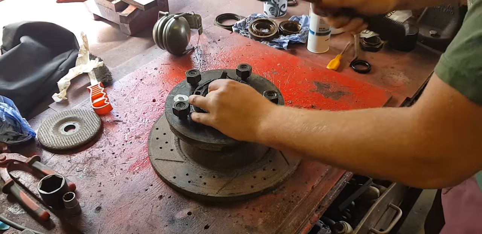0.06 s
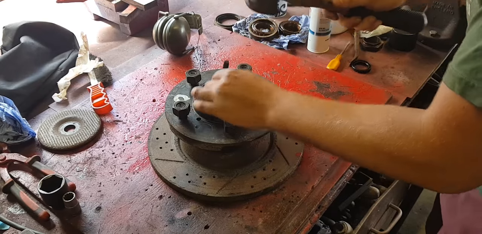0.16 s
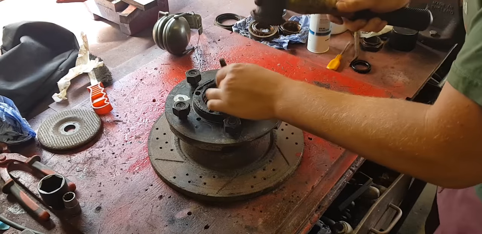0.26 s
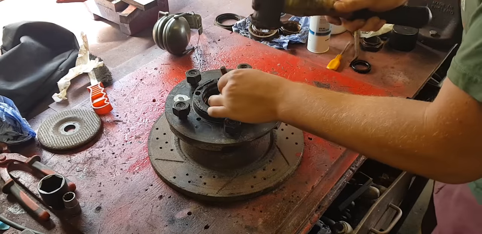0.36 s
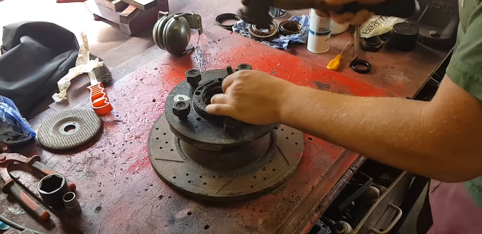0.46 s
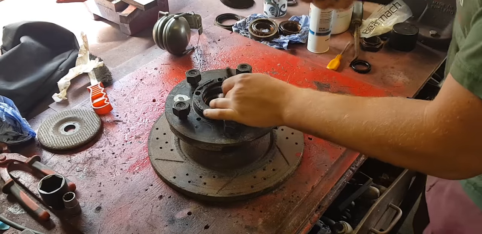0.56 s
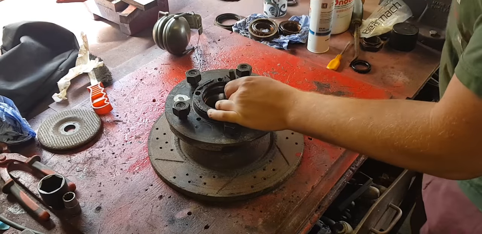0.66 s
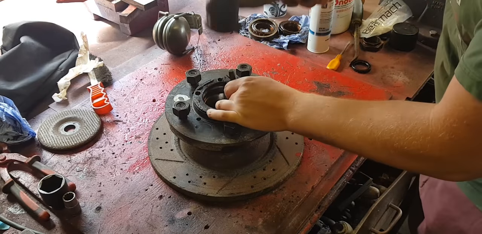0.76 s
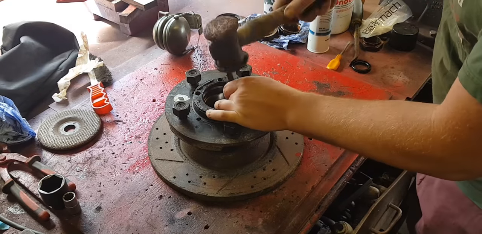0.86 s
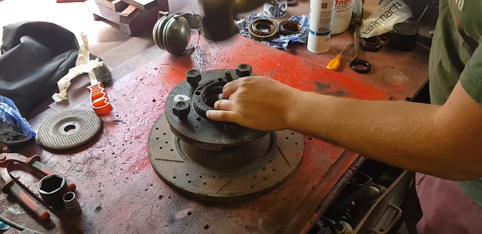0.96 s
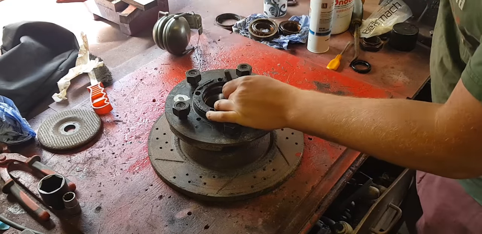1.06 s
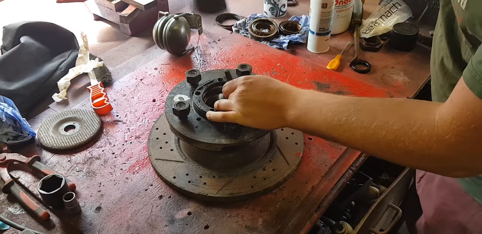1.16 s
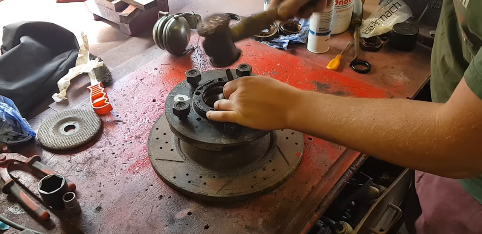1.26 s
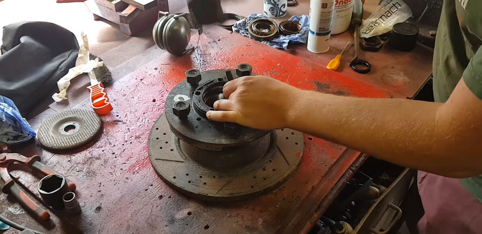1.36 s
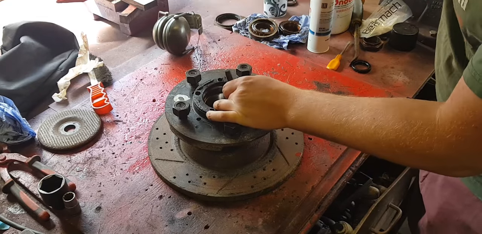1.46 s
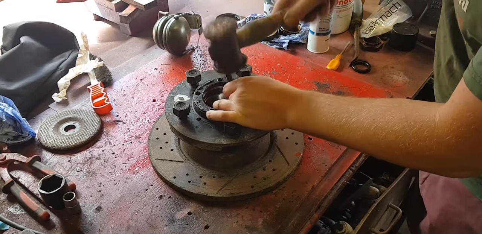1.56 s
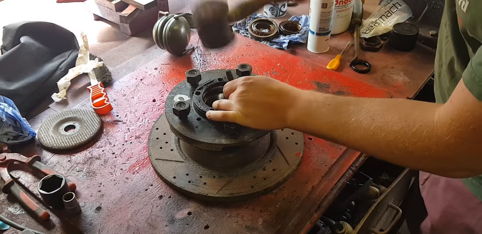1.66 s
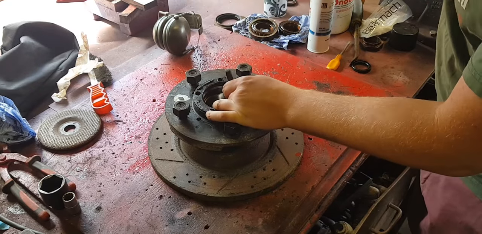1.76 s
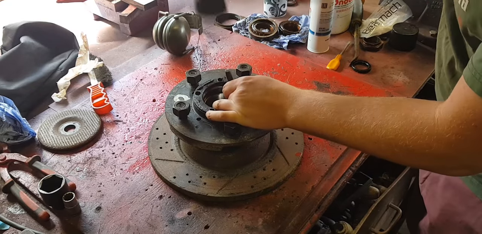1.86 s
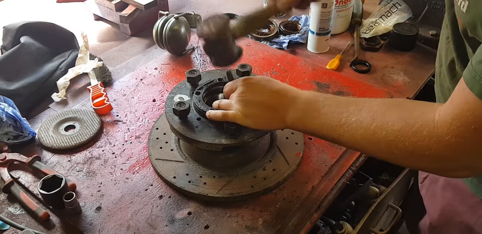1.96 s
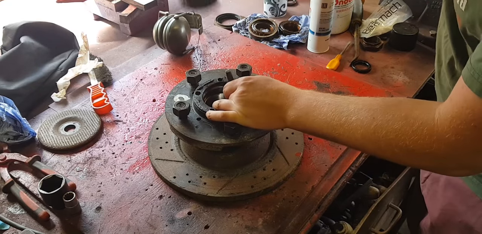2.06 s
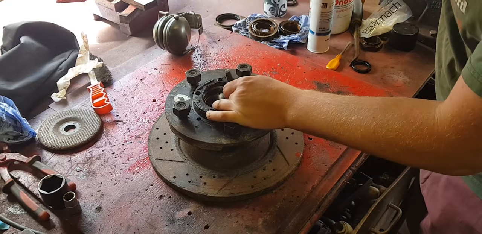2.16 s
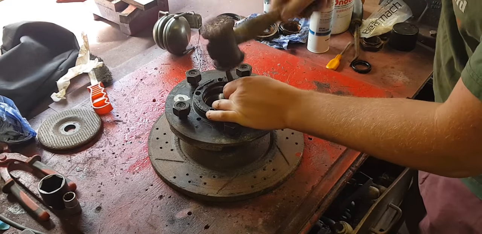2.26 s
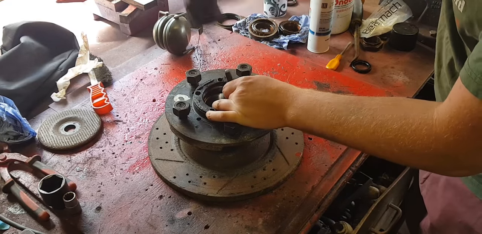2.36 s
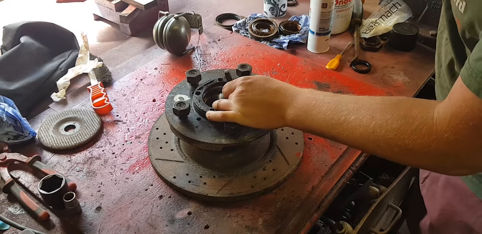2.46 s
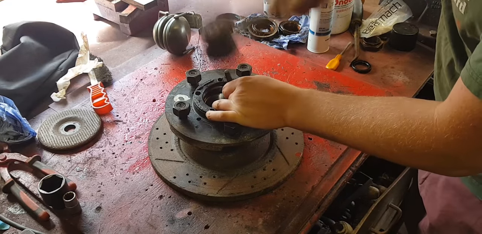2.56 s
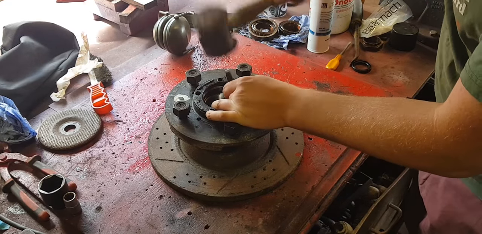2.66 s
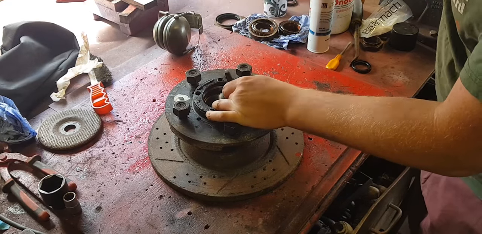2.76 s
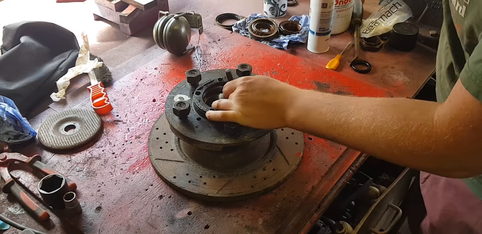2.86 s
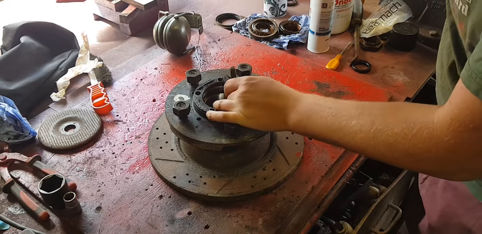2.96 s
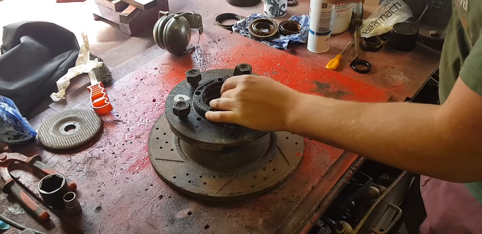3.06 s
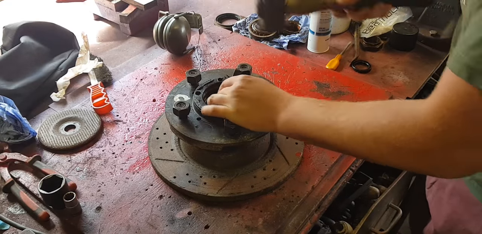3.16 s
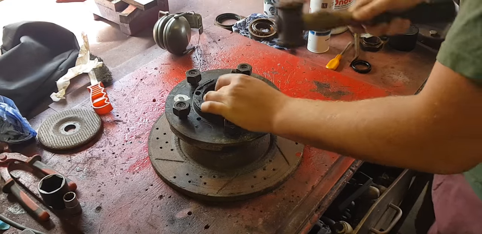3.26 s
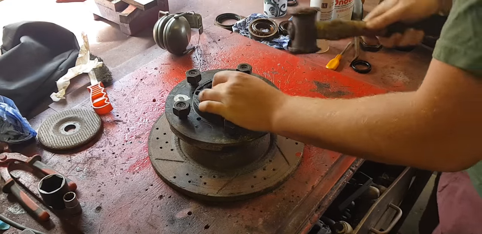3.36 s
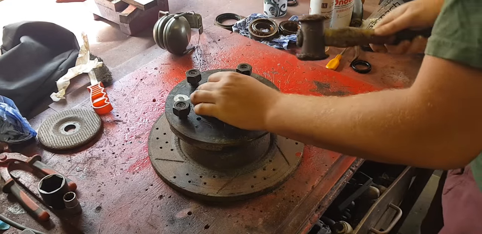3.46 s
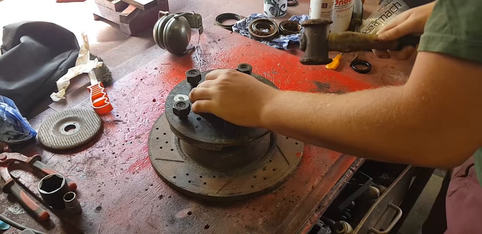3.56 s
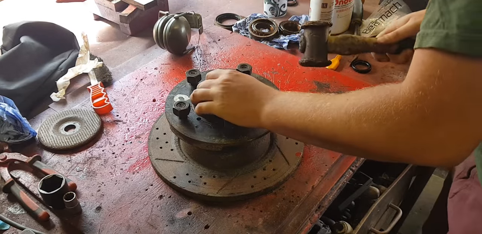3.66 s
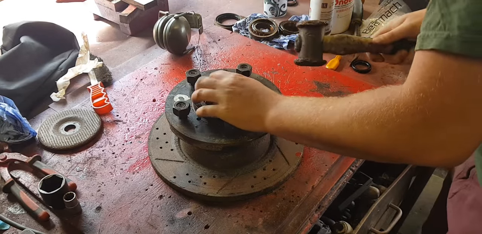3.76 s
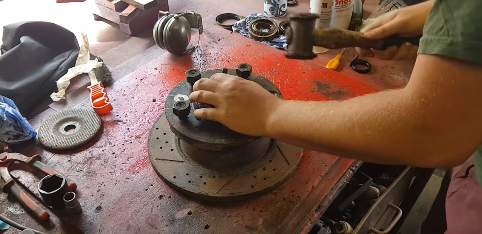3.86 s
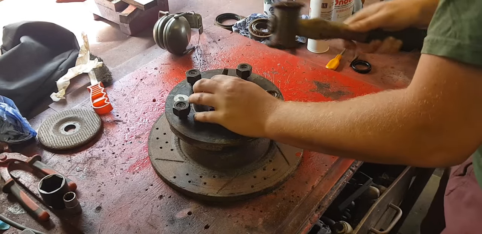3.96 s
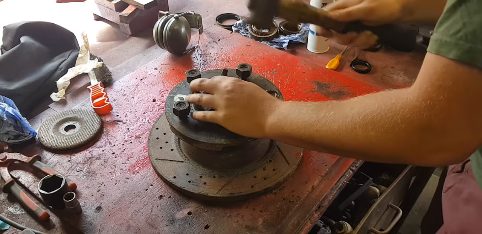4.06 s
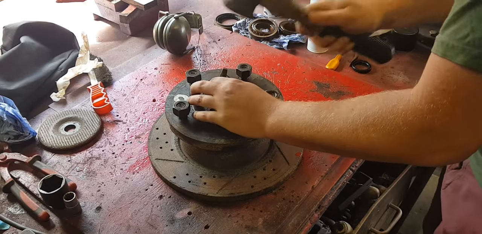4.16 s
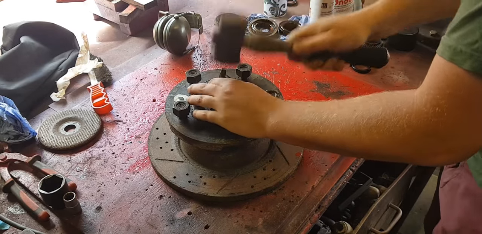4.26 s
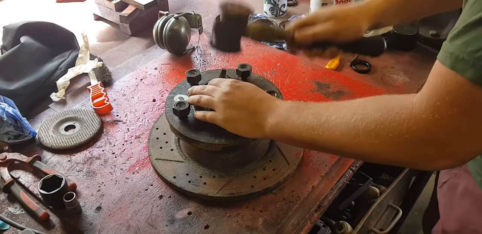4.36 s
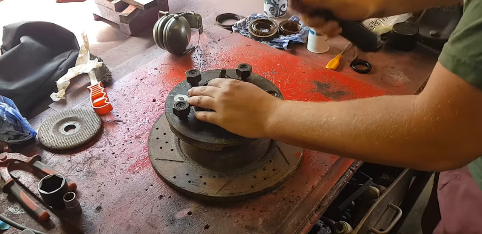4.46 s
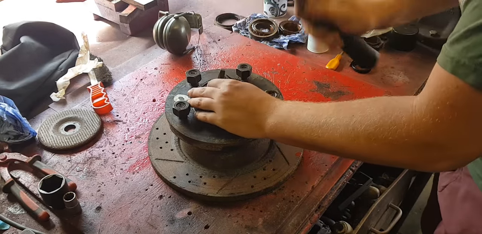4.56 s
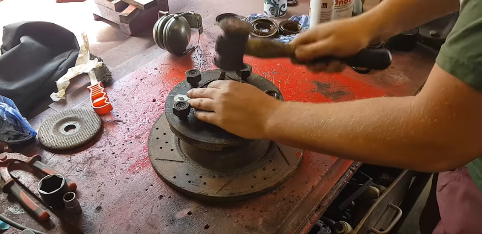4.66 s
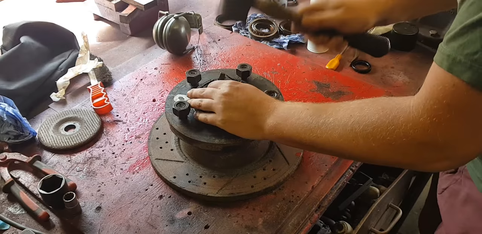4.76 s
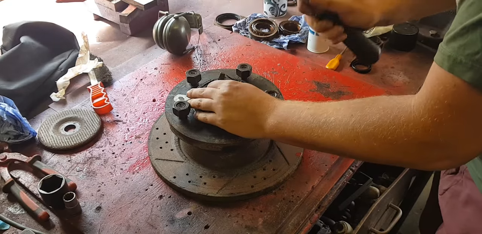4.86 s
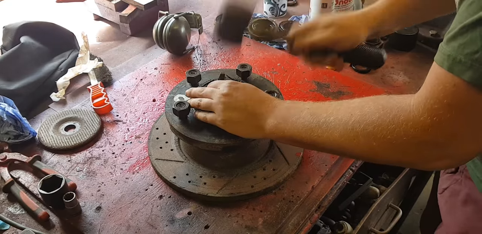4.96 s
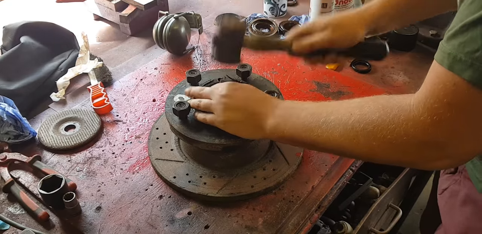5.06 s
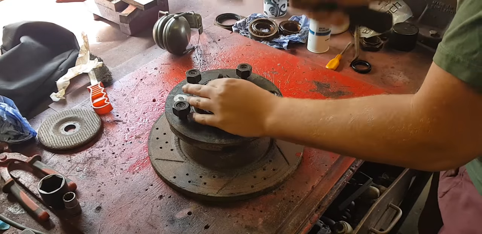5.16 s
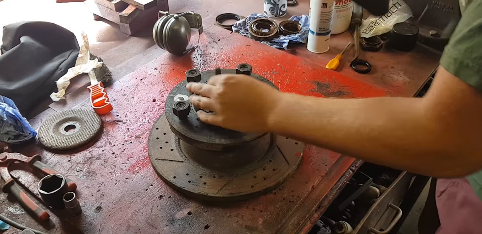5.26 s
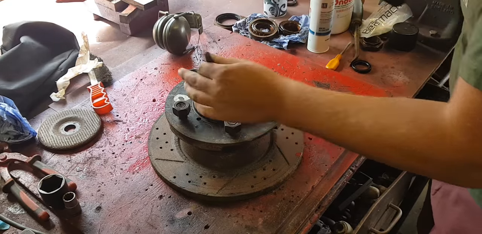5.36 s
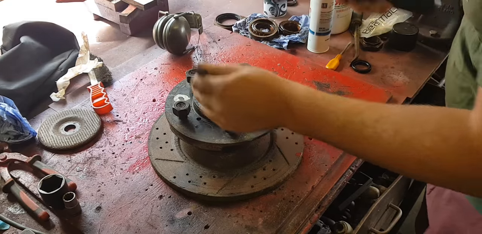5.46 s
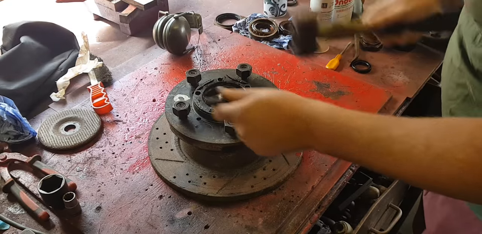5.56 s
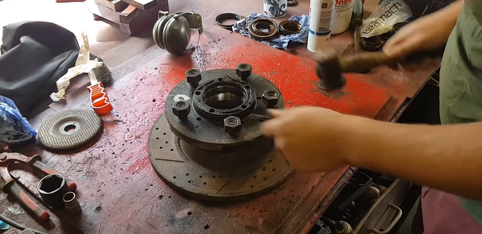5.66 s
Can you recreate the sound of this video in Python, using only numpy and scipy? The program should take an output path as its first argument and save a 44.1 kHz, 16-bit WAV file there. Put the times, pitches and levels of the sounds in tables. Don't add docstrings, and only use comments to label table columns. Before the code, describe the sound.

Close stereo capture at a garage workbench: the tail of an earlier blow, delicate clinks as a punch is placed, then a run of five thudding, cracking metal blows about a third of a second apart. After a quiet gap with tiny clinks, three spaced blows follow, the last with a rapid hollow clatter. Loud peaks are squashed; distant motor and insects stay very faint.

```python
import sys
import numpy as np
from scipy import signal
from scipy.fft import rfft, irfft
from scipy.io import wavfile
from scipy.ndimage import uniform_filter1d

SR = 44100
rng = np.random.default_rng(int(sys.argv[2]) if len(sys.argv) > 2 else 0)


def persist_wave(psi):
    counts = np.round(np.clip(psi, -1, 1) * 32767).astype(np.int16)
    wavfile.write(sys.argv[1], SR, np.atleast_2d(counts).T)


def makeup_ratio(level_db):
    decades = np.asarray(level_db, float) / 20
    return 10 ** decades


N = 251362
LEAD = 11025
SOUND_LAG_S = 0.002

# time_s, push_into_hub_db, steel_snap_db, squareness_db (as crack gained)
BLOWS = [(-0.16, -4.5, -18, 3), (0.8992, -24.5, -30.5, 1.3), (0.9866, -54, -39, 6.8), (1.283, -14, -23, -7),
         (1.6158, -7, -18, -1.7), (1.9552, -5, -18.5, 1.8), (2.2873, -7, -17.5, 3.5),
         (2.628, -5.5, -15.5, 2), (4.3327, -21, -33.5, -4), (4.6852, -13.5, -18, -0.3),
         (5.0368, -23.5, -18, 4.5), (5.0436, -50, -31, -7)]
THUMP_UNDER_PUSH_DB, RING_UNDER_SNAP_DB = -8, -1.5
CRACK_PUSH_SHARE = 0.51
# freq_hz, level_db, t60_s
BENCH_MODES = [(62, -6.5, 0.1), (80, -5.5, 0.16), (118.2, -5.5, 0.11), (159, 1.5, .05), (233, 0.5, 0.065),
               (265, 2.5, 0.033), (323, 0.5, 0.03)]
# freq_hz, level_db, t60_s
SWAY_MODES = [(28.7, -6.5, 0.071)]
# freq_hz, level_db, t60_s
HUB_MODES = [(371.7, 6, 0.065), (442.6, -2, 0.11), (437, -7, 0.078), (639, -8, 0.11), (694, -12.5, 0.012),
             (932, -14, 0.086), (1066.3, -4, 0.04), (1318, -11, 0.034), (1410, -21.5, 0.023),
             (1556, -21, 0.021)]
# freq_hz, level_db, t60_s
STEEL_MODES = [(2740, -15.5, .03), (3140, -11, .03), (4100, -9, 0.006), (5900, -12, 0.025),
               (6250, -13, 0.02), (10900, -7, .02), (11250, -6, 0.025), (12100, -8.5, 0.02),
               (14300, -11, .03), (8600, -12, .11), (11480, -5, .11), (13590, -7, .1)]
# freq_hz, density_db_per_hz
THUD_SPECTRUM = [(120, -23), (250, 0.5), (400, 3), (700, -5), (1200, -14), (1800, -16), (2600, -26),
                 (5000, -50.5)]
# freq_hz, density_db_per_hz
CRACK_SPECTRUM = [(300, 4.5), (1200, 4.5), (2000, -4), (3000, -1.5), (4200, -4), (5400, -11.5),
                  (7000, -7.5), (15000, -40)]
# freq_hz, density_db_per_hz
SIZZLE_SPECTRUM = [(3000, -24.5), (5400, -4), (7300, -8), (8800, -2.5), (10000, -0.5), (11500, 2.5),
                   (13600, 0.5), (15500, -5.5)]

# time_s, impact_db, hollow_knock_db
DROPS = [
    (5.0455, -23, -38),
    (5.0553, -9, -12),
    (5.0575, -7, -17.5),
    (5.0655, -15.5, -20),
    (5.0975, -11, -27),
]
# freq_hz, level_db, t60_s
RACE_MODES = [(994, -12, 0.025), (1170, -5.5, 0.019), (1925, -11.5, .02), (2285, -14.5, 0.082),
              (2650, -0.45, 0.0038), (3560, -7.5, .006), (4053, -5.5, 0.036), (4373, -4.5, 0.019),
              (6260, -16, 0.0425)]
# freq_hz, level_db, t60_s
BORE_MODES = [(389, 3.5, 0.072), (683, -10.5, 0.05)]

# time_s, tick_db, knock_db, seat_over_disc_db
TOUCHES = [(0.110, -76, -60, 11), (0.3245, -42.5, -64, 8), (0.338, -42.5, -70, 2), (0.389, -47.5, -77, -8),
           (0.4982, -33, -46, 2.5), (0.659, -71, -66, -1), (0.864, -76, -62, -14.5), (0.876, -69, -71, -3),
           (0.9005, -60.5, -36.5, -10), (0.9875, -53, -50.5, -8.5), (3.4387, -47.5, -64.5, 24),
           (3.4527, -42.5, -56, 12.5), (3.588, -58, -74, 5), (4.579, -71, -76, 8),
           (5.590, -58.5, -72.5, -2.5)]
# time_s, ring_db, tip_over_shaft_db
CLINKS = [
    (0.3245, -64, 14),
    (0.389, -74, 13),
    (0.4982, -86, -7),
    (0.9005, -51, 8),
    (0.9875, -54.5, 12),
    (3.4387, -68, 26),
    (3.4527, -54, 6),
    (3.588, -95, -5),
]
# freq_hz, level_db, t60_s
SEAT_MODES = [(1456, -2, 0.019), (1578, -3, 0.0079)]
# freq_hz, level_db, t60_s
DISC_MODES = [(403.6, -2, 0.042), (943.6, -4.9, 0.091), (1120, -3.8, 0.05), (1255, 4.5, 0.01)]
# freq_hz, level_db, t60_s
TIP_MODES = [(3026, -31, 0.11), (9120, 10.5, 0.059), (9580, -5, 0.032), (12700, -34, .04)]
# freq_hz, level_db, t60_s
SHAFT_MODES = [(3160, -12, 0.17), (6000, -11, 0.17), (6100, 11, 0.07), (5600, -19, .015)]
# freq_hz, level_db, t60_s
FACE_MODES = [(2600, -24, 0.087), (3080, -15, 0.056), (5500, -6, .015), (6500, -11.5, 0.014)]
# freq_hz, density_db_per_hz
TICK_SPECTRUM = [(1000, -25), (3000, -3.5), (6000, -1.5), (10000, 1.5), (15000, 3.5)]

# freq_hz, t60_s
GARAGE_T60 = [(60, 0.29), (250, 0.3), (1000, 0.27), (4000, 0.28), (8000, 0.24), (15000, 0.16)]
# freq_hz, level_db
ECHO_COLOUR = [(40, -2.5), (80, -0.5), (200, -6.5), (400, -5), (1000, -1), (3000, 1), (15000, -7.5)]
# freq_hz, likeness (0 to 1)
LIKENESS = [(60, 1), (200, 0.85), (500, 0.7), (1000, 0.086), (4000, 0.038), (12000, 0.011)]
# freq_hz, left_over_right_db
LEFT_OVER_RIGHT = [(60, -0.2), (200, -0.3), (500, -3), (1290, -3.5), (2380, -2.44), (4400, -4.5), (8120, 8),
                   (13000, 1)]

# time_s, rumble_db
RUMBLE_LEVEL = [(0.0, -46), (0.27, -64.5), (0.63, -53), (1.13, -69.5), (2.2, -50), (2.65, -52.5), (3.21, -77),
                (3.57, -67), (4.09, -73.5), (4.51, -56), (5.02, -56), (5.7, -65.5)]
# freq_hz, density_db_per_hz
RUMBLE_SPECTRUM = [(20, -18.5), (38, -20), (58, 5.5), (72, -7.5), (90, -30.5), (200, -73.5)]
# freq_hz, density_db_per_hz
AIR_SPECTRUM = [(290, -30.5), (500, -9), (1240, -6), (1660, -13), (4550, -11), (8540, -27.5), (12700, -14),
                (16000, -15.5)]
AIR_DB, AIR_FOLLOWS = -71, 0.3
# freq_hz, density_db_per_hz
MURMUR_SPECTRUM = [(20, -12.5), (45, -16), (100, 2), (130, -11), (200, -12), (350, -24), (700, -43.5),
                   (2000, -67.5)]
MURMUR_DB = -62.5
MOTOR_HZ, MOTOR_DB = 97, -62
# freq_hz, level_db, width_hz
MOTOR_HUM = [(100.22, -65.5, 16.0), (178, -77, 12)]
# start_s, end_s, freq_hz, width_hz, level_db
CHIRRS = [
    (0.737, 0.882, 7100, 200, -79),
    (2.548, 2.631, 4000, 250, -70.5),
    (2.9, 3.203, 7060, 200, -82),
    (4.575, 4.67, 2500, 2480, -75.5),
    (4.813, 5, 5300, 898, -69.5),
    (5.44, 5.656, 3890, 141, -73),
    (5.49, 5.76, 4010, 216.4, -72),
    (5.554, 5.666, 2200, 2500, -73),
]


def blows():
    time_s, push_db, snap_db, square_db = np.transpose(BLOWS)
    crack_db = square_db + CRACK_PUSH_SHARE * push_db + (1 - CRACK_PUSH_SHARE) * snap_db
    thump_db, ring_db = push_db + THUMP_UNDER_PUSH_DB, snap_db + RING_UNDER_SNAP_DB
    rows = np.transpose([time_s, crack_db, thump_db, push_db, ring_db, snap_db])
    thump = makeup_ratio(7.5) * struck(rows, column=2, modes=BENCH_MODES, contact_hz=505, spread_db=3)
    sway = struck(rows, column=2, modes=SWAY_MODES, contact_hz=30, spread_db=2)
    knock = makeup_ratio(-3.5) * struck(rows, column=3, modes=HUB_MODES, contact_hz=3020, spread_db=1)
    thud = makeup_ratio(2) * crack(rows, column=3, spectrum=THUD_SPECTRUM, t60_s=0.04, rise_s=0.002)
    ring = makeup_ratio(7.5) * struck(rows, column=4, modes=STEEL_MODES, contact_hz=18700, spread_db=2)
    snap = makeup_ratio(-0.5) * crack(rows, column=1, spectrum=CRACK_SPECTRUM, t60_s=0.027, rise_s=0.00085)
    sizzle = makeup_ratio(3.5) * crack(rows, column=5, spectrum=SIZZLE_SPECTRUM, t60_s=0.087, rise_s=0.00016)
    return thump + sway + knock + thud + ring + snap + sizzle


def race():
    hollow = makeup_ratio(-3) * struck(DROPS, column=2, modes=BORE_MODES, contact_hz=1980, spread_db=0.5)
    ring = makeup_ratio(-6) * struck(DROPS, column=1, modes=RACE_MODES, contact_hz=9500, spread_db=0.5)
    noise = makeup_ratio(-5.5) * crack(DROPS, column=1, spectrum=CRACK_SPECTRUM, t60_s=0.0044, rise_s=0.000067)
    return hollow + ring + noise


def touches():
    rings = 0
    for table, upper, lower in [(TOUCHES, SEAT_MODES, DISC_MODES), (CLINKS, TIP_MODES, SHAFT_MODES)]:
        rows = leaning(table)
        rings = rings + struck(rows, column=1, modes=upper, contact_hz=18000, spread_db=0)
        rings = rings + struck(rows, column=2, modes=lower, contact_hz=18000, spread_db=0)
    face = makeup_ratio(-2) * struck(TOUCHES, column=1, modes=FACE_MODES, contact_hz=18000, spread_db=2)
    tick = makeup_ratio(-7) * crack(TOUCHES, column=1, spectrum=TICK_SPECTRUM, t60_s=0.075, rise_s=0.001)
    return face + makeup_ratio(6.5) * rings + tick


def leaning(rows):
    rows = np.array(rows)
    level_db, half_lean_db = rows[:, -2], rows[:, -1] / 2
    return np.transpose([rows[:, 0], level_db + half_lean_db, level_db - half_lean_db])


def clicks(rows, column, spread_db):
    rows, out = np.array(rows), np.zeros(N + LEAD)
    at = np.round((rows[:, 0] + SOUND_LAG_S) * SR).astype(int) + LEAD
    out[at] = makeup_ratio(rows[:, column] + spread_db * rng.standard_normal(len(rows)))
    return out


def struck(rows, column, modes, contact_hz, spread_db):
    out = 0
    for k, (freq_hz, level_db, t60_s) in enumerate(modes):
        radius, turn = makeup_ratio(-60 / (t60_s * SR)), 2 * np.pi * freq_hz / SR
        hit = clicks(rows, column, spread_db) * makeup_ratio(level_db) * (-1) ** k + 1e-18
        out = out + signal.lfilter([0, np.sin(turn)], [1, -2 * radius * np.cos(turn), radius ** 2], hit)
    lowest_hz = min(mode[0] for mode in modes)
    out = signal.sosfilt(signal.butter(2, 0.46 * lowest_hz, "high", fs=SR, output="sos"), out)
    return signal.sosfilt(signal.butter(1, min(contact_hz, 19000), fs=SR, output="sos"), out)


def crack(rows, column, spectrum, t60_s, rise_s):
    size = 4096
    t = np.arange(size) / SR
    freq_hz = np.maximum(np.fft.rfftfreq(size, 1 / SR), 20)
    decay = makeup_ratio(-60 * t / t60_s) + 1.4 * np.exp(-t / 0.0015)
    shape = decay * (1 - np.exp(-t / rise_s)) + 1e-9
    burst = shape * rng.standard_normal((len(rows), size))
    for _ in range(4):
        phase = np.angle(rfft(burst))
        even = irfft(makeup_ratio(at_hz(spectrum, freq_hz)) * np.exp(1j * phase))
        burst = shape * even / np.sqrt(uniform_filter1d(even ** 2, size=96) + 1e-30)
    out = np.zeros(N + LEAD + size)
    for row, one in zip(rows, burst):
        at = round((row[0] + SOUND_LAG_S) * SR) + LEAD
        out[at:at + size] += makeup_ratio(row[column]) * one
    return out[:N + LEAD]


def garage(loud, light, wet_db, light_wet_db, gap_s, build_s):
    t = np.arange(SR) / SR
    late_s = np.maximum(t - gap_s, 0)
    echo = 0
    for freq_hz, band in bands(rng.standard_normal((2, 2, SR))):
        build = 1 - np.exp(-late_s / (build_s + 0.62 / freq_hz))
        decay = makeup_ratio(-60 * t / at_hz(GARAGE_T60, freq_hz))
        level = makeup_ratio(at_hz(ECHO_COLOUR, freq_hz)) * np.sqrt(freq_hz / 60000 / SR)
        echo = echo + rms_one(band * build * decay) * level
    send = makeup_ratio(wet_db) * loud + makeup_ratio(light_wet_db) * light
    near = signal.sosfilt(signal.butter(1, 90, "high", fs=SR, output="sos"), loud + light)
    direct = np.stack([near, np.roll(near, 2)])
    both = direct + signal.fftconvolve(send[None], echo, axes=1)[:, :N + LEAD]
    lean_db = at_hz(LEFT_OVER_RIGHT, np.maximum(np.fft.rfftfreq(64, 1 / SR), 20)) * [[0.5], [-0.5]]
    ports = np.roll(irfft(makeup_ratio(lean_db)), 32, axis=1)
    start = LEAD + 32
    return signal.fftconvolve(both, ports, axes=1)[:, start:start + N]


def background():
    t = np.arange(N) / SR
    rumble_db = np.interp(t, *np.transpose(RUMBLE_LEVEL))
    air_db = AIR_DB + AIR_FOLLOWS * (rumble_db - rumble_db.mean())
    layers = 0
    for freq_hz, band in bands(rng.standard_normal((2, 2, N))):
        levels_db = [at_hz(s, freq_hz) for s in (RUMBLE_SPECTRUM, AIR_SPECTRUM, MURMUR_SPECTRUM)]
        layers = layers + band * makeup_ratio(levels_db)[:, None, None]
    rumble, air, murmur = [rms_one(layer) for layer in layers]
    out = rumble * makeup_ratio(rumble_db) + air * makeup_ratio(air_db) + murmur * makeup_ratio(MURMUR_DB)
    wander = signal.lfilter([1], [1, -0.99995], rng.standard_normal(N))
    out += makeup_ratio(MOTOR_DB) * np.sin(2 * np.pi * MOTOR_HZ * t + 0.8 * rms_one(wander))
    for freq_hz, level_db, width_hz in MOTOR_HUM:
        out += makeup_ratio(level_db) * rms_one(narrow(freq_hz, width_hz)[0])
    for start_s, end_s, freq_hz, width_hz, level_db in CHIRRS:
        progress = np.clip((t - start_s) / (end_s - start_s), 0, 1)
        swell = np.sqrt(np.clip(np.sin(np.pi * progress), 0, 1))
        out += makeup_ratio(level_db) * swell * rms_one(narrow(freq_hz, width_hz))
    return out


def narrow(freq_hz, width_hz):
    radius = np.exp(-np.pi * width_hz / SR)
    section = [1, 0, -1, 1, -2 * radius * np.cos(2 * np.pi * freq_hz / SR), radius ** 2]
    return signal.sosfilt([section, section], rng.standard_normal((2, N + SR)))[:, SR:]


def bands(white):
    edges_hz = 20 * 2 ** np.arange(0, 9.9, 0.4)
    for k, (low, high) in enumerate(zip(edges_hz, edges_hz[1:])):
        mid, side = signal.sosfilt(signal.butter(2, [low, high], "band", fs=SR, output="sos"), white[k % 2])
        freq_hz = np.sqrt(low * high)
        alike = np.clip(at_hz(LIKENESS, freq_hz), 0, 1)
        yield freq_hz, np.sqrt(1 + alike) * mid + np.sqrt(1 - alike) * side * [[1], [-1]]


def at_hz(points, freq_hz):
    table_hz, values = np.transpose(points)
    return np.interp(np.log(freq_hz), np.log(table_hz), values)


def rms_one(x):
    return x / np.sqrt(np.mean(x ** 2) + 1e-30)


def scene():
    hits = garage(blows(), race() + touches(), wet_db=-1, light_wet_db=-1.5, gap_s=0.00047, build_s=0.0014)
    return hits + background()


def roll_off(x):
    return signal.sosfilt(signal.butter(12, 16800, fs=SR, output="sos"), x)


def record(dry):
    ceiling = 0.8
    dry = signal.sosfilt(signal.butter(1, 18, "high", fs=SR, output="sos"), dry)
    over_db = np.maximum(20 * np.log10(np.abs(dry).max(axis=0) + 1e-9) + 0.56, 0)
    fall_db = np.arange(N) / SR * 1500
    held_db = np.maximum.accumulate(over_db + fall_db) - fall_db
    gain = makeup_ratio(-0.7 * signal.lfilter([0.05], [1, -0.95], held_db))
    limited = ceiling * np.tanh(dry * gain / ceiling)
    mix = signal.sosfilt(signal.butter(10, 15600, fs=SR, output="sos"), limited)
    return roll_off(mix)


dry = scene()
out = record(dry)
persist_wave(out)
```